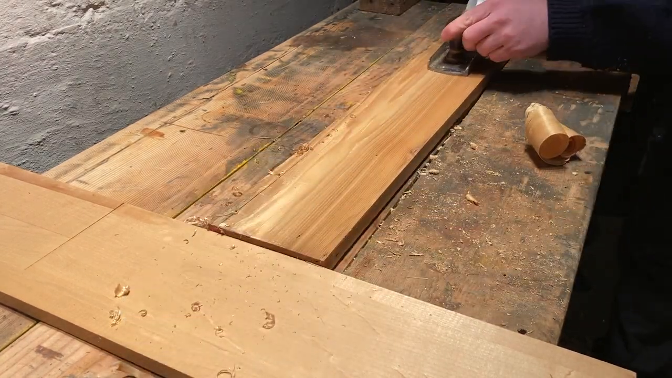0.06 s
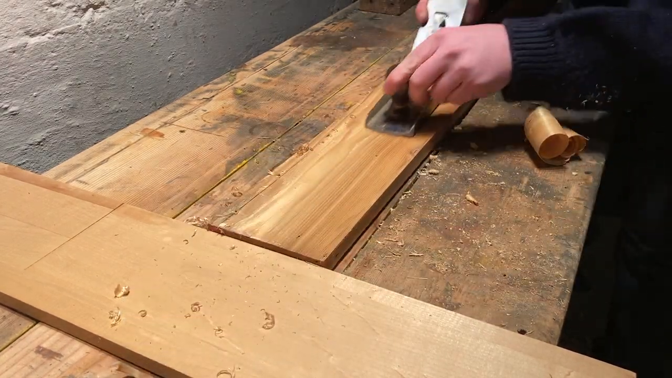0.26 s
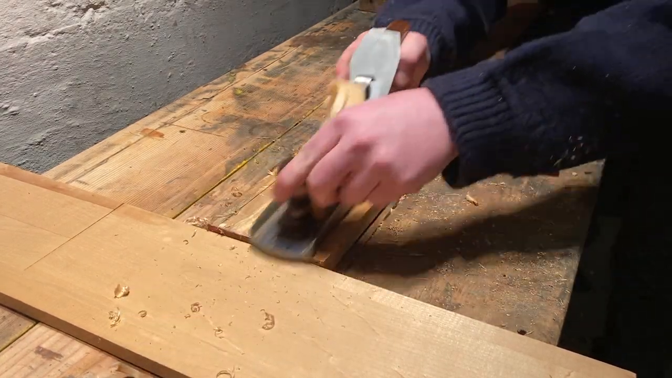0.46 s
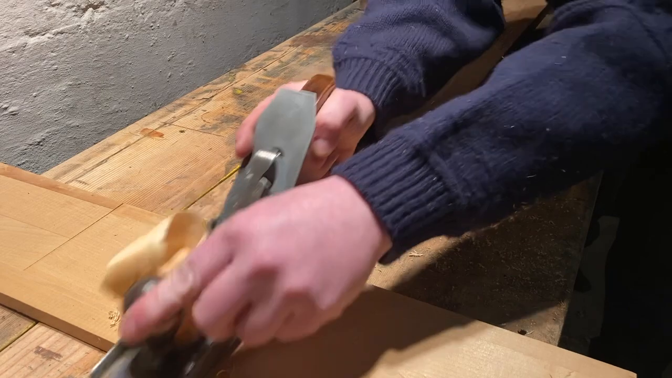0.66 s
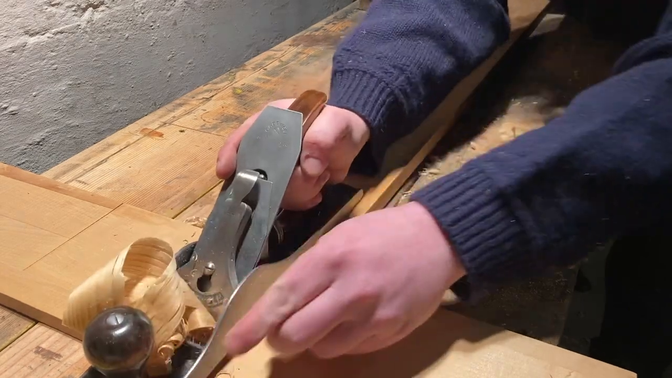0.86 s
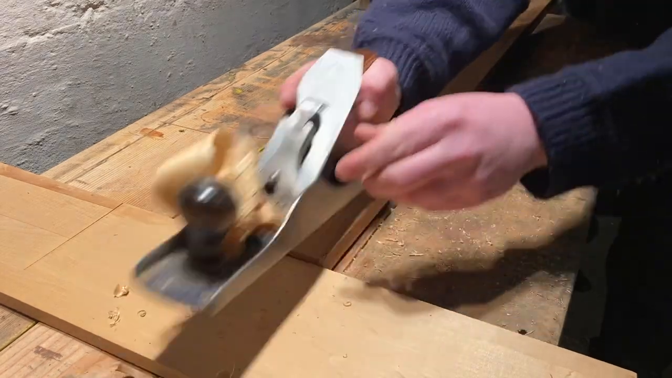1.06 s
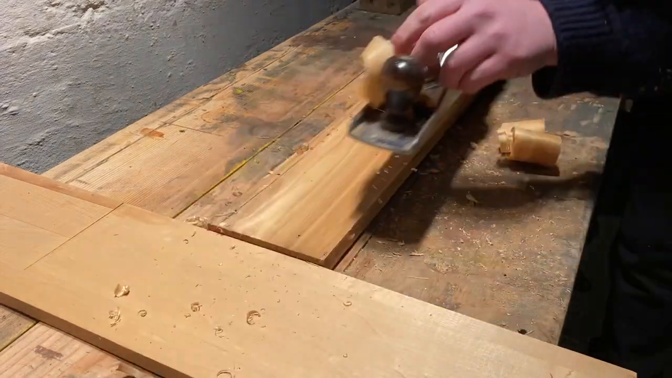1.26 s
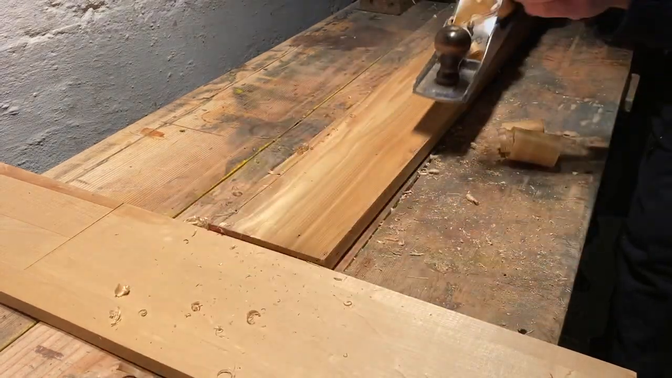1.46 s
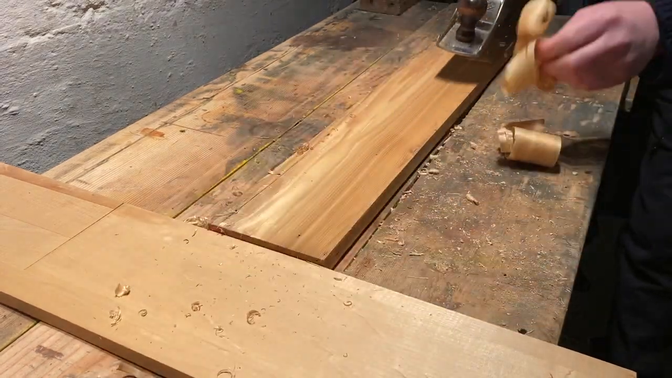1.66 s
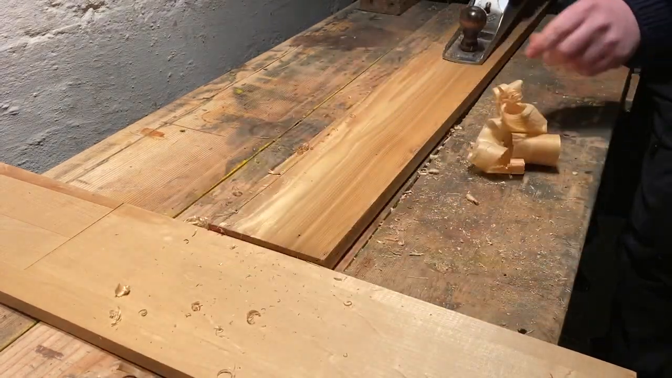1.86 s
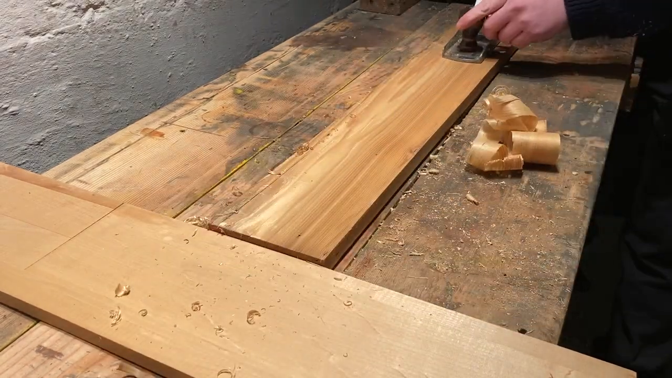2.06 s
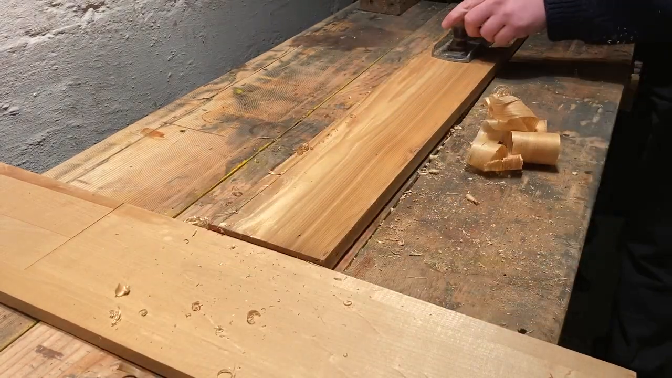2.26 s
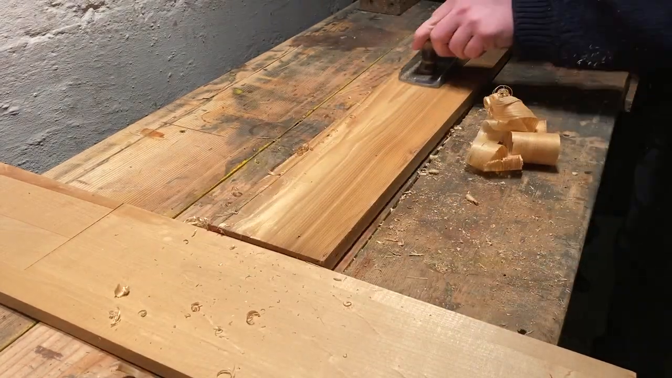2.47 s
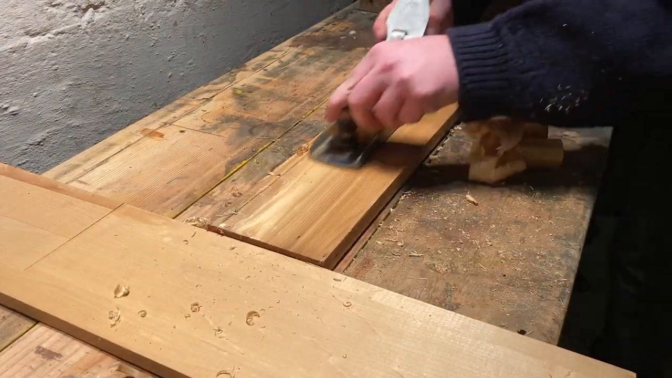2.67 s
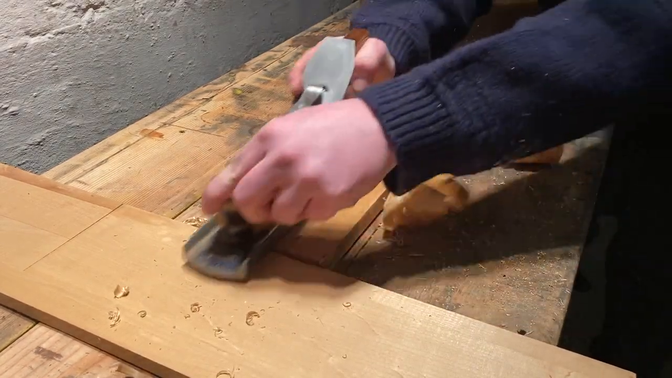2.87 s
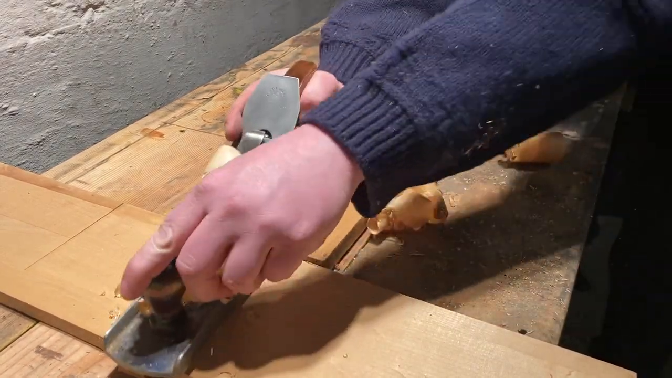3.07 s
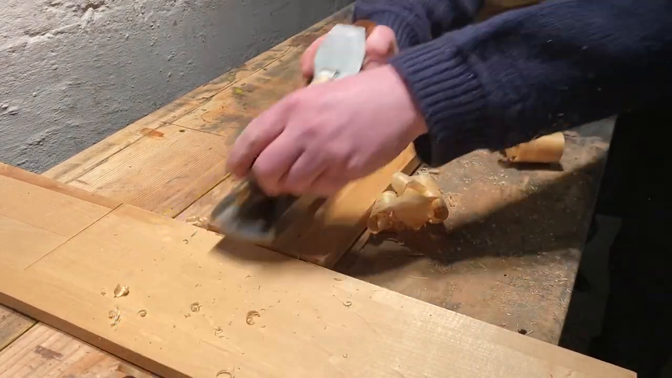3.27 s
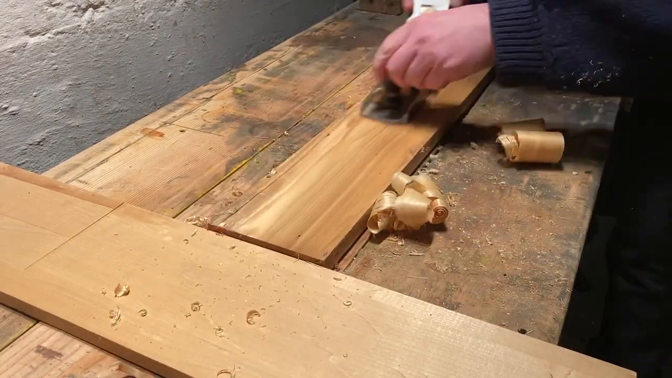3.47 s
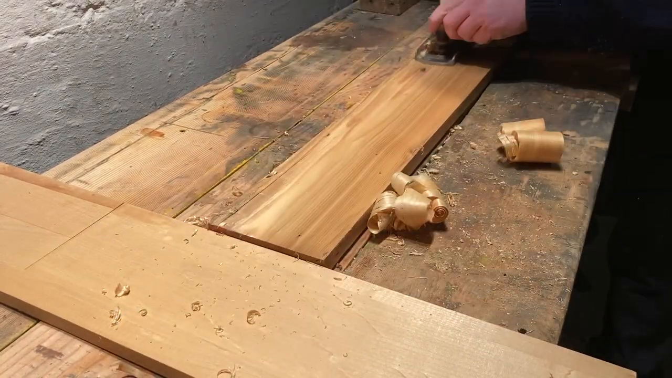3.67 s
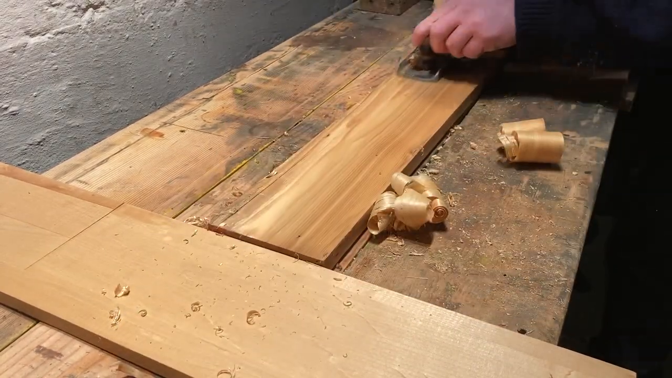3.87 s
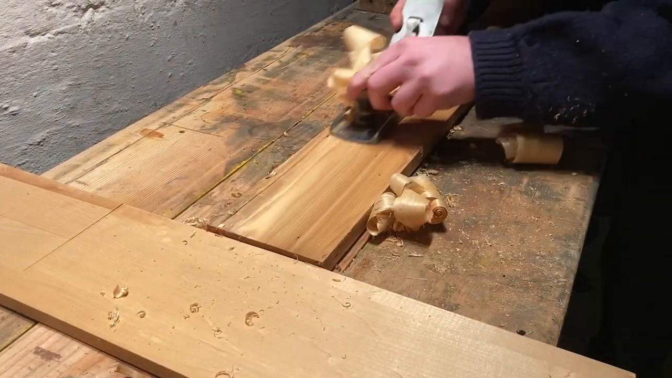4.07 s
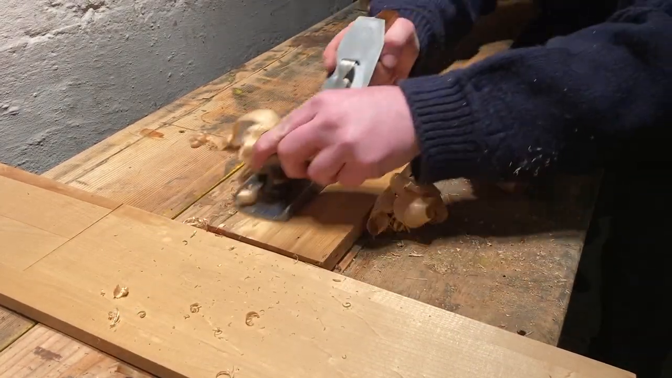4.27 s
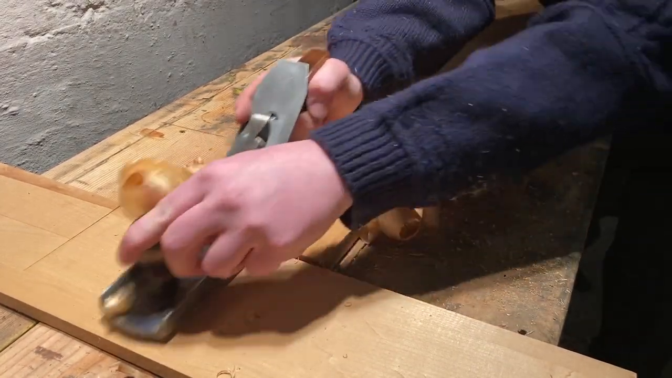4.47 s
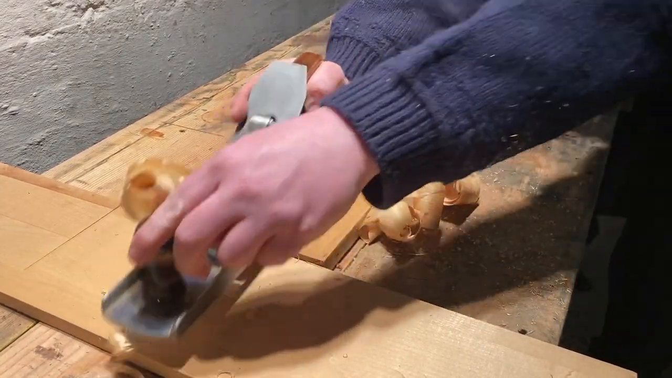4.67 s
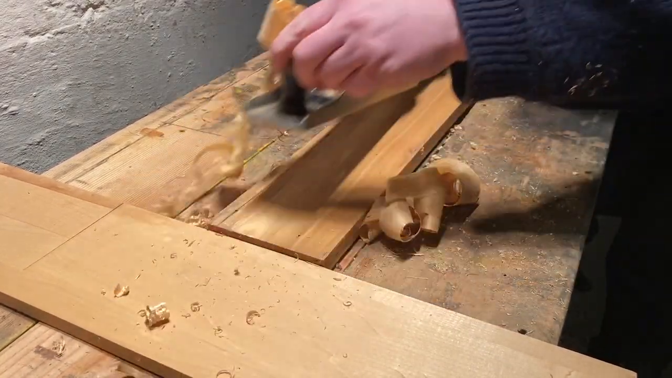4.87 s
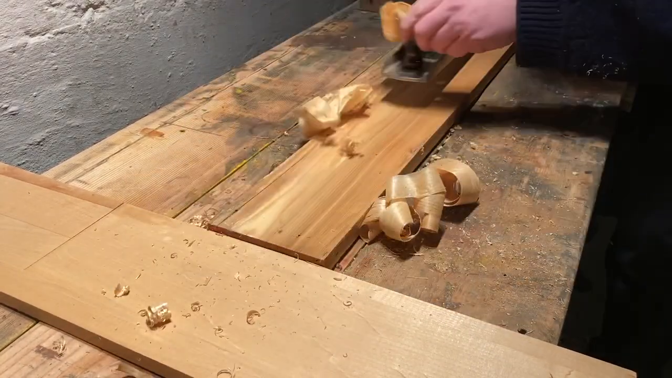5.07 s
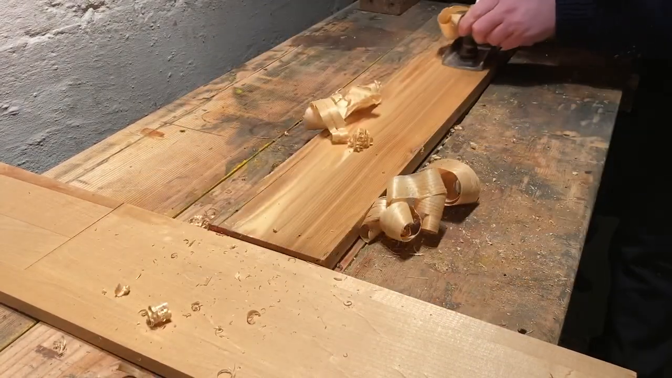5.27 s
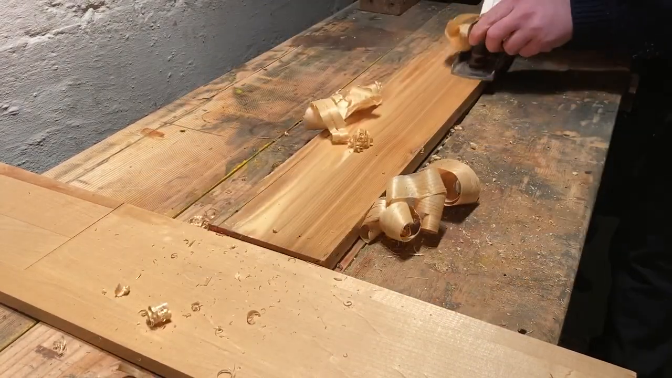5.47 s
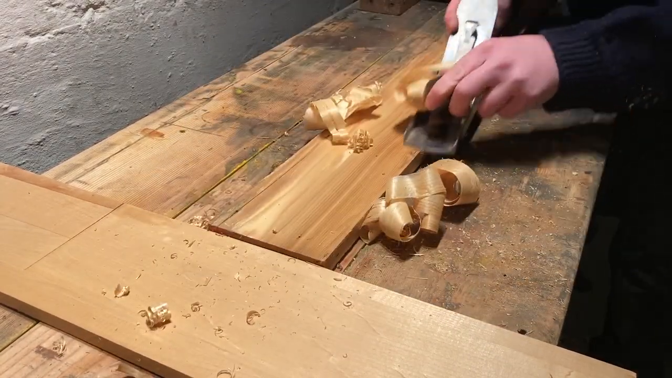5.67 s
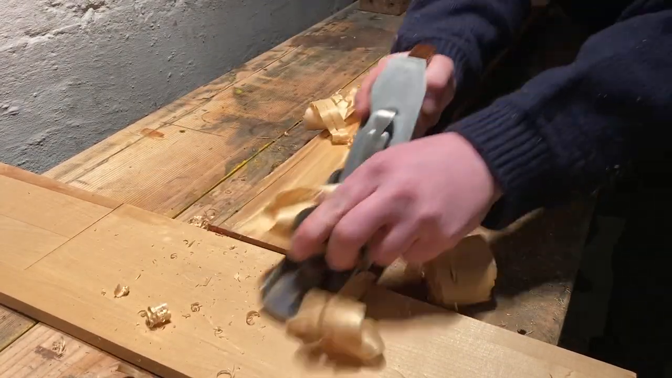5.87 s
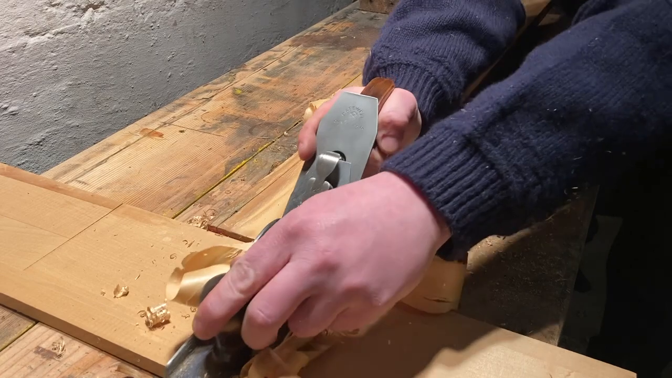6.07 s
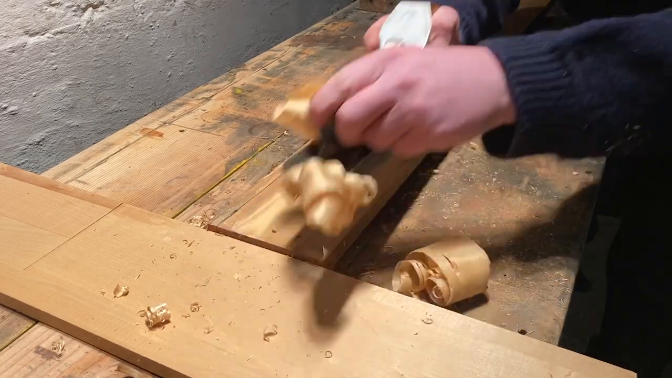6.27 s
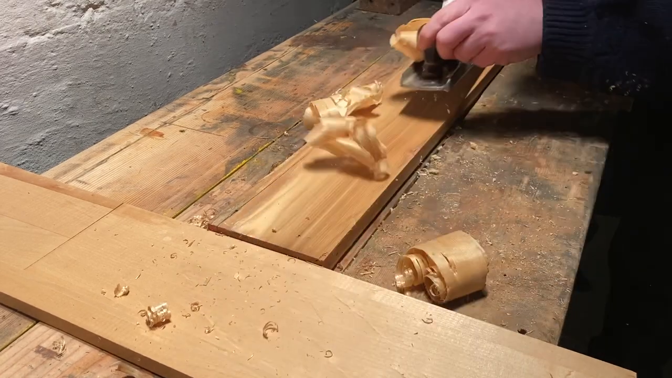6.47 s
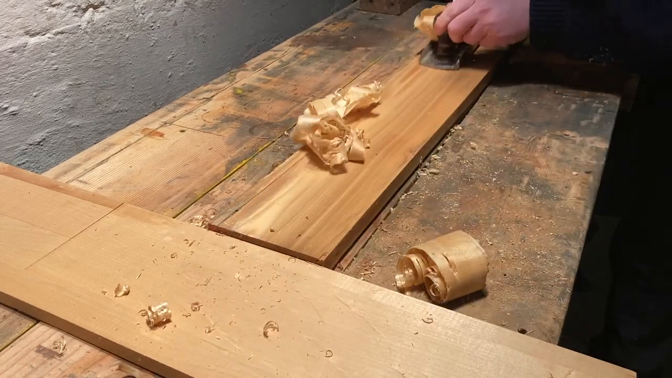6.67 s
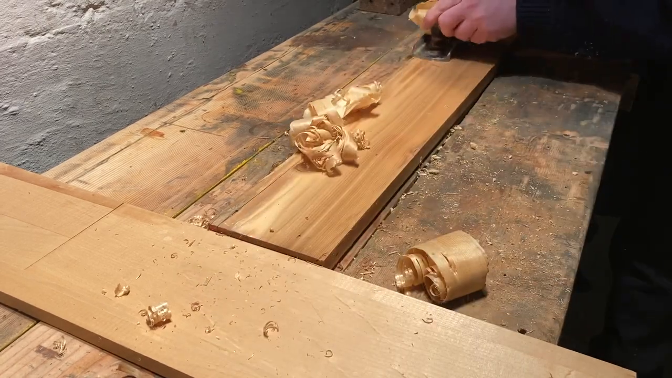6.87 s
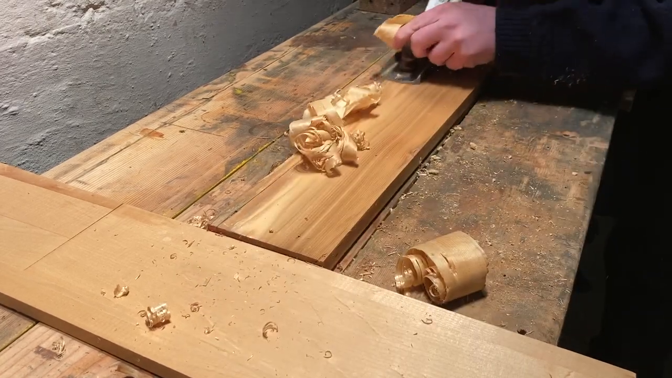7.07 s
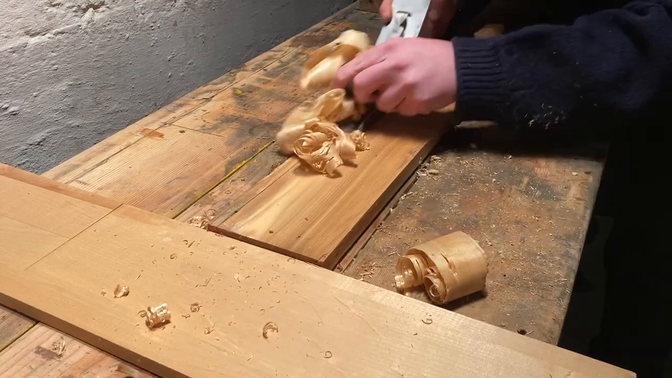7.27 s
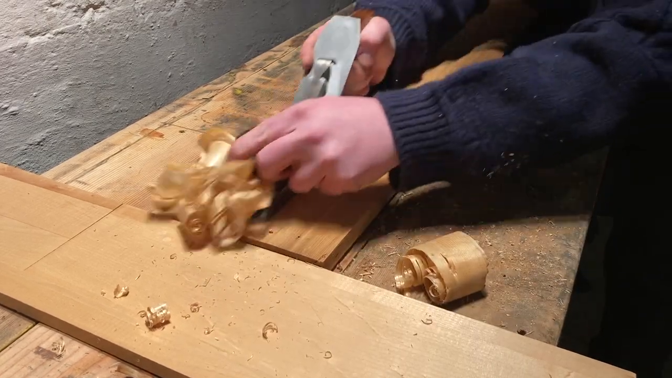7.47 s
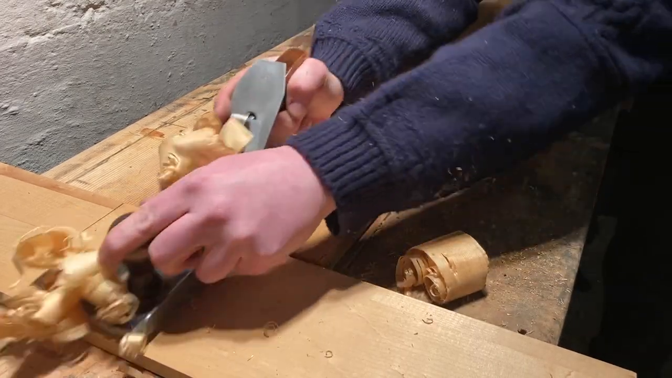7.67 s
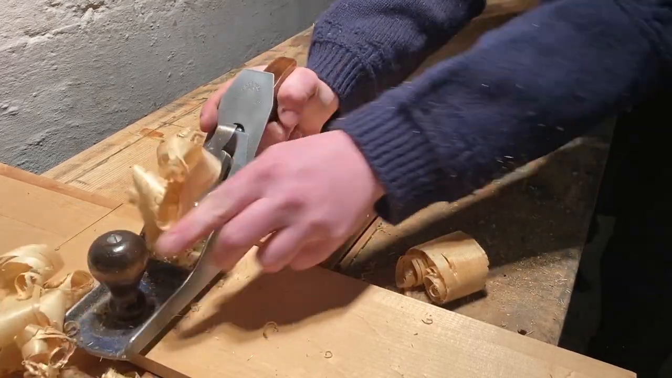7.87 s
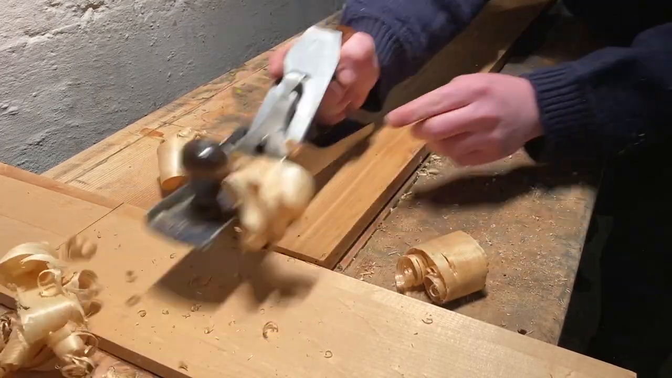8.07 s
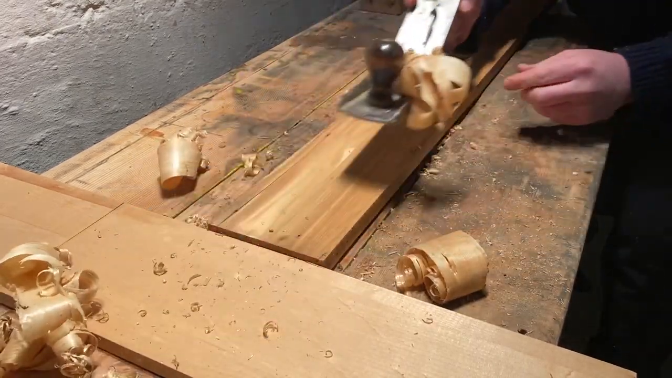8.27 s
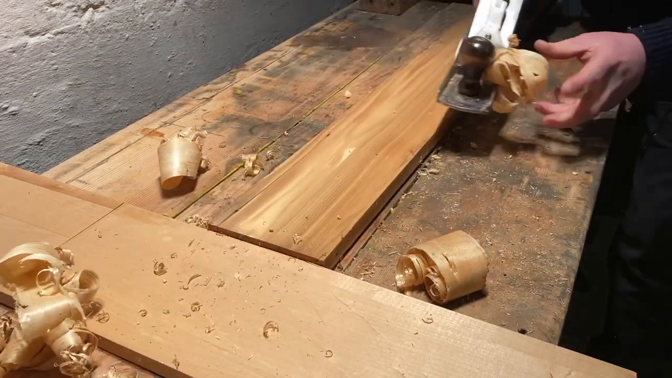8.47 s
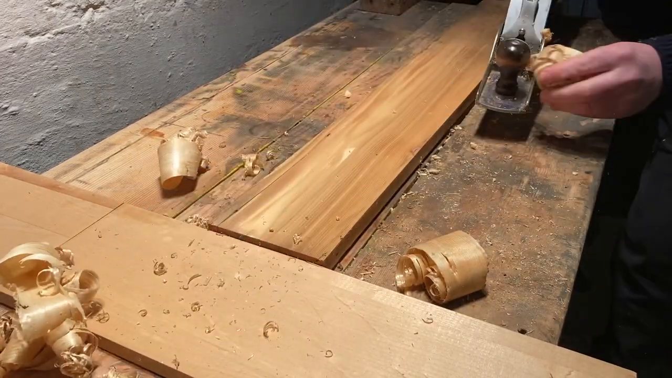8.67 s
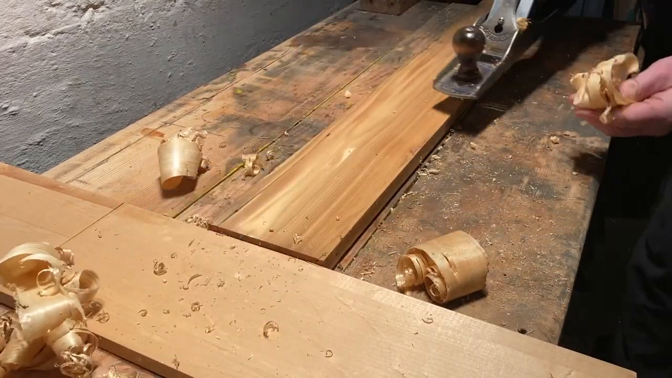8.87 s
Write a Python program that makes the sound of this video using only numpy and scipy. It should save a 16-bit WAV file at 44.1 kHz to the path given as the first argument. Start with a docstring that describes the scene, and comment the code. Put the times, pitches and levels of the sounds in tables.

```python
"""A hand plane hisses along a board over a low rumble: five strokes at a bench in a small workshop.
Tearing fibres are random clicks, heard as coloured hiss and through ringing modes of board and iron body.
Around the strokes curled shavings rustle and crack, sole and sleeves rub, and the bench creaks and clunks;
the sole squeaks as it is dragged back, the blade catches, and the plane knocks on wood.
Short wall echoes surround it all, heard in left and right."""
import sys
import numpy as np
from scipy import signal
from scipy.fft import rfft, irfft, next_fast_len
from scipy.io import wavfile

SR = 44100
rng = np.random.default_rng(int(sys.argv[2]) if len(sys.argv) > 2 else 0)


def unload_audio(sound):
    """Save the sound as a 16-bit wav file, at the path given as the first command line argument."""
    columns = np.transpose(np.atleast_2d(sound))
    # keep every value between -1 and 1, then stretch to whole-number steps
    steps = np.round(np.clip(columns, -1, 1) * 32767)
    wavfile.write(sys.argv[1], SR, steps.astype(np.int16))


N = 393813
EDGES_HZ = 20 * 2 ** np.arange(0, 9.9, 1 / 3)   # third-octave band edges


def from_db(db):
    """Decibels to gain."""
    return 10 ** (np.asarray(db) / 20)


def rms_one(x):
    """Scales to unit rms."""
    return x / np.sqrt(np.mean(x ** 2) + 1e-20)


def at_hz(points, hz):
    """Reads a table on a log-frequency axis."""
    table = np.array(points)
    return np.interp(np.log(np.maximum(hz, 1)), np.log(table[:, 0]), table[:, 1])


def bandpass(low_hz, high_hz):
    """Second-order band filter."""
    return signal.butter(2, [low_hz, high_hz], "band", fs=SR, output="sos")


def random_signs():
    """A random direction of push for every sample."""
    return rng.choice([-1, 1], N)


def controls(tables):
    """The columns of all spans over time, and a gate that opens each span with short fades."""
    t, gate, out = np.arange(N) / SR, 0, 0
    for rows in tables:
        s, *columns = np.transpose(rows)
        fade = np.clip(np.minimum(t - s[0], s[-1] - t) / .006 + .5, 0, 1)   # 6 ms
        gate = gate + fade
        out = out + fade * np.array([np.interp(t, s, c) for c in columns])
    return gate, out / np.maximum(gate, 1e-9)


def drift(rate_hz):
    """Slow random wander with spread 1: noise through two equal low-pass poles."""
    r = np.exp(-80 * np.pi * rate_hz / SR)   # computed at every 40th sample
    noise = rng.standard_normal(N // 40 + 2002)
    slow = signal.lfilter([1], [1, -2 * r, r * r], noise)[2000:]
    return np.interp(np.arange(N) / 40, np.arange(len(slow)), rms_one(slow))


def grains(per_s, spread_db, clump_db):
    """Clicks at random times, in clumps, with uneven sizes; rms 1."""
    sizes = from_db(spread_db * np.minimum(rng.exponential(1, N), 5)) * random_signs()
    born = rng.random(N) < per_s * from_db(clump_db * drift(40)) / SR
    return rms_one(sizes * born)


def colour(x, spectrum, patchy_db, tilt_db=0):
    """Third-octave bands that flicker separately, tilted about the spectrum's top; rms 1 before the tilt."""
    out, plain = 0, 0
    top_hz = max(spectrum, key=lambda point: point[1])[0]
    for k, (low, high) in enumerate(zip(EDGES_HZ, EDGES_HZ[1:])):
        hz = np.sqrt(low * high)
        if spectrum[0][0] < hz < spectrum[-1][0] * 1.1:
            band = (-1) ** k * signal.sosfilt(bandpass(low, high), x)
            band = band * from_db(at_hz(spectrum, hz) + patchy_db * drift(17))
            plain = plain + band
            out = out + band * from_db(tilt_db * np.clip(np.log2(hz / top_hz), -1, 1))
    return out / np.std(plain)


def ring(force, hz, t60):
    """A mode: a unit click sets a decaying sine of starting height 1 ringing."""
    r, w = from_db(-60 / (max(t60, .005) * SR)), 2 * np.pi * hz / SR
    return signal.lfilter([0, np.sin(w)], [1, -2 * r * np.cos(w), r * r], force + 1e-18)


def rubbed(modes, force, damping, wander_db):
    """Modes under a pressed contact: ring times scaled by damping, each level wandering; rms 1."""
    out = 0
    for k, (hz, db, t60) in enumerate(modes):
        level = from_db(db + wander_db * drift(3.95))
        out = out + (-1) ** k * level * ring(force, hz, t60 * damping)
    return rms_one(out)


def burst(t60, length):
    """Noise that dies away."""
    return rng.standard_normal(length) * from_db(-60 * np.arange(length) / SR / max(t60, .004))


# spectrum of the room rumble: pitch_hz, relative level_db (per Hz)
RUMBLE = [(22, -26), (36, 3), (60, 1.5), (95, 6), (135, 3), (200, -11.5), (300, -9.5), (600, -23.5),
          (1000, -24.5), (3600, -34), (8000, -37), (16000, -32)]


def rumble():
    """Steady low noise of the room, its bands flickering separately."""
    return from_db(-48.5) * colour(rng.standard_normal(N), RUMBLE, patchy_db=3.0)


# moves of hands and plane: peak_s, rise_s, fall_s (20 dB each),
# peak levels rustle_db (shavings), rub_db (sole and sleeves), creak_db (bench)
HANDLING = [(.76, 0.065, 0.03, -50, -50, -43), (.945, 0.0043, 0.14, -59, -51, -56),
            (1.035, 0.13, 0.025, -63, -57, -49.5), (1.093, .01, 0.04, -82, -52, -51.5),
            (1.153, .005, 0.056, -66, -56, -57), (1.234, .03, 0.75, -47, -54, -73),
            (1.41, 0.23, 0.15, -40, -53, -73), (1.555, 0.028, .06, -40, -59, -53.5),
            (1.625, .01, 0.27, -47.5, -67, -70), (1.73, .1, 0.12, -46.5, -59.5, -68),
            (1.86, 0.045, 0.042, -54, -60, -57), (2.03, .02, 0.043, -57, -71, -60),
            (2.2, 0.066, 0.056, -66, -63, -66), (3.17, 0.038, 0.18, -60.5, -59, -60),
            (3.31, 0.24, 0.15, -49, -46, -48), (3.365, 0.046, 0.3, -48, -42, -40),
            (3.51, 0.036, 0.095, -39.5, -51, -42), (3.601, 0.027, 0.083, -38, -47, -42.5),
            (3.694, 0.079, .05, -41, -46, -46), (3.8, 0.027, .03, -59, -47, -57),
            (4.692, 0.14, 0.092, -48.5, -48.5, -47), (4.772, .005, 0.026, -55, -76, -71),
            (4.83, .03, .15, -59, -80, -73), (4.985, .01, 0.21, -55, -76, -82),
            (5.08, 0.072, 0.095, -51, -55, -54.5), (5.23, 0.06, 0.23, -55, -52.5, -49),
            (6.17, 0.28, 0.07, -41.5, -57, -49.5), (6.26, 0.092, 0.06, -47.5, -67, -74),
            (6.33, 0.011, 0.25, -64, -54, -57), (6.45, 0.035, 0.032, -40.5, -62, -56),
            (6.54, 0.044, 0.11, -51.5, -72, -63), (6.65, 0.048, 0.071, -58, -57, -62),
            (6.7, 0.1, 0.15, -54, -66, -57), (6.77, 0.14, 0.087, -68, -55, -55),
            (6.86, 0.027, 0.041, -61, -59, -58), (7.8, 0.18, 0.52, -49, -81, -76),
            (7.905, 0.029, 0.082, -42.5, -78, -70), (8.006, 0.036, 0.089, -43, -58, -52),
            (8.149, 0.0083, 0.094, -55, -47.5, -51), (8.295, .01, 0.093, -65, -59, -60),
            (8.385, .01, 0.23, -65, -62.5, -58.5), (8.575, .006, .05, -45, -56, -64),
            (8.6, 0.028, 0.18, -39.5, -49.5, -61), (8.665, 0.099, 0.023, -44, -64, -48.5),
            (8.72, 0.051, 0.24, -58, -62, -52.5), (8.862, 0.071, 0.092, -46, -54, -46.5)]


def moves():
    """Every move swells to its peak and dies away, evenly in dB; overlapping moves add in power."""
    power = np.zeros((3, N))
    for s, rise_s, fall_s, *levels_db in HANDLING:
        first = max(round((s - 3 * rise_s) * SR), 0)
        last = min(round((s + 3 * fall_s) * SR), N)
        t = np.arange(first, last) / SR - s
        shape_db = -20 * np.maximum(-t / max(rise_s, 1e-3), t / max(fall_s, 1e-3))
        power[:, first:last] += from_db(2 * (np.array(levels_db)[:, None] + shape_db))
    return np.sqrt(power)


# spectra of shavings, of sole and sleeves, of the bench: pitch_hz, relative level_db (per Hz)
RUSTLE = [(1500, -63), (3000, -3), (5500, -6.5), (8000, -1), (11000, 11), (13000, -20), (16000, 11)]
RUB = [(500, -20.5), (1200, -8.5), (2000, -4.5), (3000, 2), (4500, -4), (7000, -9.5), (12000, -27)]
CREAK = [(120, -25), (260, -7), (400, 11), (800, 4), (1300, 4.5), (2500, 2)]


def handling():
    """Shavings rustle in clumped grains; sole and sleeves rub; the bench answers low."""
    rustle, rub, creak = moves()
    crisp = grains(per_s=13000, spread_db=3.5, clump_db=5.0)
    smooth = grains(per_s=10000, spread_db=4.0, clump_db=5.5)
    out = rustle * colour(crisp, RUSTLE, patchy_db=1.8)
    out += rub * colour(smooth, RUB, patchy_db=1.5)
    return out + creak * colour(smooth * random_signs(), CREAK, patchy_db=3.5)


# dry shavings crack and land: start_s, middle_db, treble_db
CRACKS = [(0.0334, -40, -60), (0.778, -35, -55), (0.9426, -34.5, -72), (1.0887, -67, -65),
          (1.1493, -41, -70), (1.2308, -45, -31.5), (1.477, -45, -62), (1.537, -50, -50),
          (1.5634, -31.5, -60), (1.6227, -54, -50), (1.753, -32.5, -31.5), (1.8952, -35, -32),
          (3.604, -30.5, -48), (3.6994, -32.5, -44), (4.7724, -56, -45), (4.9841, -55, -55),
          (6.2518, -36.5, -36), (6.3212, -37, -65), (6.5335, -53, -41), (7.635, -26.5, -25.5),
          (7.8056, -63, -40), (7.9009, -62, -41), (8.0064, -41, -30.5), (8.1478, -32, -62),
          (8.2924, -46, -72), (8.571, -44, -43), (8.883, -39, -60)]


def cracks():
    """A sudden noise burst that dies quickly, with a middle and a treble part."""
    out, length = np.zeros(N + SR), SR // 4
    middle = bandpass(1200, 6000)
    treble = signal.butter(2, 6000, "high", fs=SR, output="sos")
    for s, middle_db, treble_db in CRACKS:
        noise = burst(.048, length)
        sound = from_db(middle_db) * signal.sosfilt(middle, noise)
        sound += from_db(treble_db) * signal.sosfilt(treble, noise)
        out[round(s * SR):][:length] += sound
    return out[:N]


# soft bumps on board or bench: start_s, level_db (before the decay), pitch_hz, t60_s
CLUNKS = [(0.959, -40.5, 272, 0.13), (1.018, -40.5, 495, 0.085), (2.992, -26, 380, 0.057),
          (3.285, -38, 754, 0.12), (3.363, -32, 465, 0.085), (3.402, -31.5, 508, 0.12),
          (3.429, -31, 512, 0.092), (4.482, -29, 390, 0.1), (6.107, -38, 275, 0.19),
          (8.707, -39.5, 332, 0.072), (8.854, -36, 894, 0.063)]


def clunks():
    """A soft push swells one low mode over 5.4 ms while it decays."""
    out, t = np.zeros(N + SR), np.arange(SR // 5) / SR
    for s, db, hz, t60 in CLUNKS:
        swell = np.minimum(t / 0.0054, 1)
        decay = from_db(db - 60 * t / max(t60, .01))
        out[round(s * SR):][:len(t)] += decay * swell * np.sin(2 * np.pi * hz * t)
    return out[:N]


# the sole is drawn back over the wood: time_s, level_db
DRAG = [(3.3, -60), (3.372, -36), (3.398, -48), (3.408, -40), (3.432, -62), (3.47, -55)]
# squeaking modes of the plane: pitch_hz, relative level_db, t60_s (before damping)
SQUEAK = [(1430, -6, 0.027), (2900, -9, 0.026), (3043, -2.5, 0.05), (2920, -4.5, .04)]


def drag():
    """Stick-slip grains excite a few tight modes of the plane."""
    gate, (level_db,) = controls([DRAG])
    slips = grains(per_s=6200, spread_db=2.0, clump_db=0.0)
    return gate * from_db(level_db) * rubbed(SQUEAK, slips, damping=0.8, wander_db=4.5)


# the blade catches, one list per glide: time_s, level_db, pitch_hz
CATCH = [
    [(5.66, -48, 1383), (5.68, -34, 1390), (5.75, -49, 1570), (5.77, -36, 1577), (5.8, -50, 1540)],
    [(5.86, -35, 1650), (5.902, -48, 1370), (5.93, -49, 1260)],
    [(7.44, -36, 1398), (7.486, -40, 1387), (7.536, -29, 1260), (7.572, -46, 1360), (7.62, -31, 1330)],
]


def catch():
    """A narrow scrape: noise in a band roughly 150 Hz wide that follows the gliding pitch."""
    gate, (db, hz) = controls(CATCH)
    phase = 2 * np.pi * np.cumsum(hz) / SR
    return gate * from_db(db) * (drift(75) * np.sin(phase) + drift(89) * np.cos(phase))


# the plane strikes wood: start_s, iron_db, board_db, crack_db, thud_db
KNOCKS = [(0.7112, -11, -23.5, -21, -15.5), (0.743, -29, -32, -29, -45), (0.7645, -32, -36, -35, -45.5),
          (0.7759, -30, -57, -29, -46), (1.868, -40, -24, -36, -16), (1.8848, -62, -37, -35, -15),
          (3.4448, -34, -36, -39, -24), (3.483, -19.5, -16.5, -13, -4), (3.4895, -46, -25.5, -13.5, -10),
          (3.5039, -49, -50, -31, -18), (3.8228, -30, -38, -26, -43.5), (5.1727, -15.5, -20, -26, -30),
          (5.1797, -28, -20.5, -28, -4.5), (6.5987, -35, -38, -37, -18), (6.6033, -40, -31, -36, -7.5),
          (6.8943, -43, -41, -38, -37)]
# modes of the board and the iron body, also rung by the strokes: pitch_hz, relative level_db,
# t60_s (undamped)
BOARD = [(173, -20, 0.05), (229, -22.5, 0.11), (257.3, -13.5, 0.2), (364.5, -9.5, 0.14), (390, -8.5, 0.048),
         (515, -7.5, 0.13), (639, -6.5, 0.023), (715, 2, 0.033), (847, -5, 0.073), (897, -8, 0.065),
         (1034, -4, 0.029), (1260, -14.5, 0.072)]
IRON = [(1457, 3.5, 0.015), (1789, -7, 0.034), (1800, 2, 0.019), (1985, 1, 0.025), (2414, -1, 0.013),
        (2860, -1.5, 0.012), (2875, -0.5, 0.025), (3355, -5, 0.023), (3744, -4, 0.023),
        (4400, -1.5, 0.0084), (4480, -4, 0.013), (5000, -15, 0.011), (5660, -48, 0.0064)]


def knocks():
    """Each blow strikes every mode with its own strength, with a bright crack, a rattle and a bench thud."""
    out, length = np.zeros(N + SR), SR // 3
    bands = [bandpass(*edges) for edges in ([90, 433], [300, 1220], [1300, 3500], [4500, 14000])]
    click = np.arange(length) == 0
    landing = np.minimum(np.arange(length) / SR / 0.0028, 1)   # the sole lands over 2.8 ms
    for s, iron_db, board_db, crack_db, thud_db in KNOCKS:
        # level dB, t60 s: dense modes die faster when high
        noises = (thud_db, .16), (board_db + 13, .07), (iron_db + 7.5, .03), (crack_db, .015)
        sound = np.zeros(length)
        for band, (db, t60) in zip(bands, noises):
            sound += from_db(db) * signal.sosfilt(band, burst(t60, length))
        for modes, blow_db in (BOARD, board_db), (IRON, iron_db):
            for hz, db, t60 in modes:
                strength = from_db(blow_db + db - 2.5 + rng.normal(0, 4.0))
                sound += strength * rng.choice([-1, 1]) * ring(click, hz, t60)
        out[round(s * SR):][:length] += sound * landing
    return out[:N]


# five cutting strokes, one list each: time_s, hiss_db, iron_db, board_high_db, board_low_db
STROKES = [
    [(0.0, -64, -67, -55, -65), (0.04, -51, -49, -45.5, -51), (0.168, -37, -39, -37, -45),
     (0.268, -31, -36.5, -49, -52), (0.32, -26.5, -33, -41, -55), (0.452, -27, -38, -45, -59),
     (0.472, -26.5, -34.5, -38.5, -69), (0.588, -30, -40, -31.5, -46), (0.658, -50.5, -60, -68, -52),
     (0.69, -42, -54, -61, -54), (0.705, -44, -52, -46, -46)],
    [(2.24, -79, -80, -79, -68), (2.382, -40, -39.5, -35.5, -45.5), (2.566, -31.5, -36.5, -36.5, -44),
     (2.65, -23.5, -35.5, -51, -68), (2.788, -33, -37.5, -27.5, -44), (2.796, -34, -38, -32.5, -53),
     (2.934, -30.5, -40, -38, -42), (2.976, -53, -53, -55, -55), (2.998, -53, -55, -49, -48),
     (3.044, -61, -68, -65, -74), (3.08, -81, -82, -71, -60)],
    [(3.75, -62, -67, -57, -61), (3.9, -29.5, -35.5, -38, -51), (4.034, -32, -35.5, -34, -50),
     (4.146, -26, -31, -40, -57), (4.244, -29, -36.5, -26.5, -33.5), (4.324, -30.5, -36.5, -38, -33),
     (4.37, -30.5, -32, -35, -58), (4.428, -29, -37, -40.5, -44.5), (4.476, -48, -50, -52, -49),
     (4.59, -52, -66.5, -65, -79), (4.62, -53, -60, -60, -53)],
    [(5.37, -76, -77, -73, -64), (5.436, -50.5, -48.5, -44, -57), (5.574, -34, -43.5, -47, -53),
     (5.642, -26.5, -44, -51, -69), (5.678, -30.5, -41.5, -44, -60), (5.738, -40.5, -41.5, -53, -64),
     (5.84, -27, -38.5, -52, -52), (5.904, -26.5, -35.5, -38, -58), (5.944, -33.5, -51.5, -49, -49),
     (6.058, -48, -68, -74, -81), (6.08, -71, -80, -66, -58)],
    [(6.86, -67, -70, -72, -76), (6.924, -46, -43, -33.5, -42), (7.02, -48.5, -50, -36, -51),
     (7.06, -40, -38.5, -33.5, -38.5), (7.154, -35, -36, -40.5, -51), (7.446, -31, -35.5, -40.5, -50.5),
     (7.628, -33.5, -36, -35, -39), (7.666, -50.5, -55, -55, -48), (7.782, -53, -68, -57, -63),
     (7.846, -67, -86, -84, -74), (7.86, -52, -79, -75, -76)],
]
# spectrum of the shaving's hiss: pitch_hz, relative level_db (per Hz)
HISS = [(200, -65), (500, -27), (1200, -27), (3000, -4.5), (5500, -1), (7500, -0.5), (10000, 9.5),
        (12500, -0.5), (16000, 4)]


def strokes():
    """Tearing fibres are heard directly and through the upper and lower modes of iron and board."""
    gate, (hiss_db, iron_db, board_high_db, board_low_db) = controls(STROKES)
    tear = grains(per_s=12000, spread_db=2.0, clump_db=2.5)
    # brighter when the hiss stands more than 14.5 dB above the iron's ring, else duller
    tilt_db = np.clip(0.4 * (hiss_db - iron_db - 14.5), -6, 6)
    out = from_db(hiss_db) * colour(tear, HISS, patchy_db=1.2, tilt_db=tilt_db)
    bodies = ((iron_db, IRON[4:], 0.3), (iron_db, IRON[:4], 0.45),
              (board_high_db, BOARD[6:], 0.5), (board_low_db, BOARD[:6], 0.73))
    for level_db, modes, damping in bodies:
        push = tear * random_signs()   # same snaps, own direction of push
        out += from_db(level_db) * rubbed(modes, push, damping, wander_db=1.85)
    return gate * out


# ring time of the room tail: pitch_hz, t60_s
SHOP_T60 = [(100, 0.46), (1000, 0.21), (8000, 0.12)]
# share of power that differs between left and right, by pitch: pitch_hz, share (0 to 1)
SIDE_SHARE = [(60, .01), (200, .04), (500, .2), (1200, .45), (2400, .7), (3300, .5), (4600, .8),
              (6000, .55), (6800, .02), (8000, .12), (9300, .0), (10300, .15), (11400, 0), (12500, .2),
              (13600, 0), (14600, .2), (15600, 0)]


def echo_tails(places):
    """Decaying noise for each place and side: fast from bench and near walls, slower and lower from the room."""
    t, tails = np.arange(SR // 3) / SR, 0
    for low, high in zip(EDGES_HZ[2::3], EDGES_HZ[5::3]):
        noise = signal.sosfilt(bandpass(low, high), rng.standard_normal((places, 2, len(t))))
        near = from_db(-60 * t / 0.036)
        late = from_db(-7 - 60 * t / at_hz(SHOP_T60, np.sqrt(low * high)))
        noise = noise * (near + late)
        energy = np.sum(noise ** 2, axis=2, keepdims=True)
        tails = tails + noise * np.sqrt(2 * (high - low) / SR / energy)   # unit gain in the band
    return tails


def workshop(x):
    """Sound alike in left and right, plus separate echoes that cross-fade through ten places in turn."""
    hop, places = 3000, 10
    tails = echo_tails(places)
    echoes, padded = np.zeros((2, N + SR)), np.pad(x, (hop, 2 * hop))
    fade = np.sin(np.pi * np.arange(2 * hop) / hop / 2)
    for i in range(0, N + hop, hop):
        faded = (padded[i:i + 2 * hop] * fade)[None]
        piece = signal.fftconvolve(faded, tails[i // hop % places], axes=1)
        echoes[:, i:i + piece.shape[1]] += piece
    size = next_fast_len(N + 4096)
    share = np.clip(at_hz(SIDE_SHARE, np.arange(size // 2 + 1) * SR / size), 0, 1)
    alike = np.sqrt(1 - share) * rfft(x, size)
    differing = np.sqrt(share) * rfft(echoes[:, hop:hop + N], size)
    return irfft(alike + differing, size)[:, :N]


def scene():
    """Rumble, shavings and tool in the workshop."""
    tool = handling() + cracks() + clunks() + drag() + catch() + knocks() + strokes()
    small = signal.butter(3, 110, "high", fs=SR, output="sos")   # the tool's sounds carry no deep bass
    return workshop(rumble() + signal.sosfilt(small, tool))


# left over right: pitch_hz, level_db
BALANCE = [(300, 0.5), (700, 2.5), (4000, 2.5), (6400, 0)]
# phase of right over left, a stepped rise in the treble: pitch_hz, phase_rad
RIGHT_PHASE = [(0, 0), (700, -.25), (1500, -.6), (2700, -2.1), (4000, -1.3), (4900, -3.1), (5500, -2.6),
               (6500, -.2), (7300, .2), (9050, 3.1), (9500, 3.2), (11150, 6.2), (11700, 6.35),
               (13300, 9.38), (13950, 9.47), (15300, 12.5), (22050, 13)]


def record(dry):
    """Left and right: the left louder in the middle range, a phase between them by pitch; the top is cut."""
    size = next_fast_len(N + 4096)
    hz = np.arange(size // 2 + 1) * SR / size
    tilt = from_db(at_hz(BALANCE, hz) / 2)   # half up on the left, half down on the right
    turn = np.exp(1j * np.interp(hz, *np.transpose(RIGHT_PHASE)))
    sides = irfft(rfft(dry, size) * [tilt, turn / tilt], size)[:, :N]
    top_cut = signal.ellip(12, .5, 75, 15760, fs=SR, output="sos")   # steep, at 15.76 kHz
    return signal.sosfilt(top_cut, sides)


dry = scene()
out = record(dry)
unload_audio(out)
```